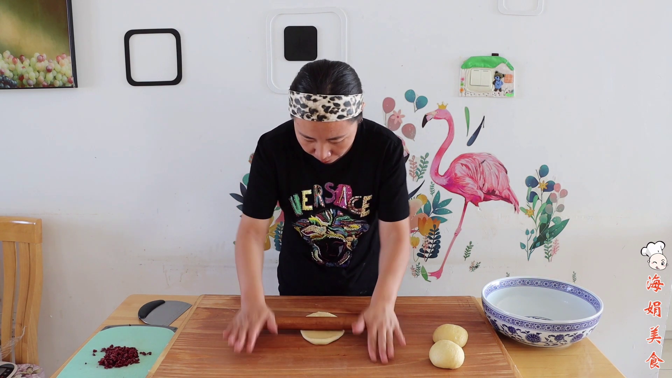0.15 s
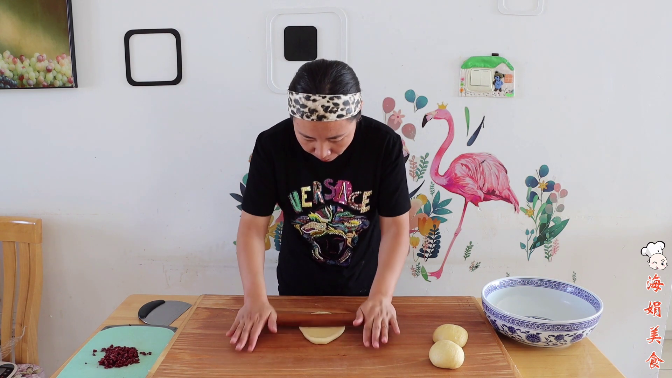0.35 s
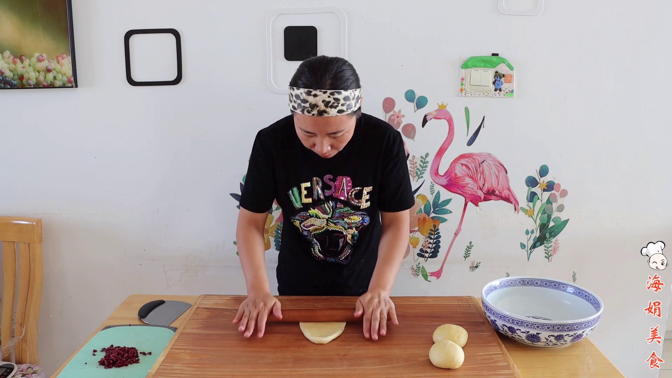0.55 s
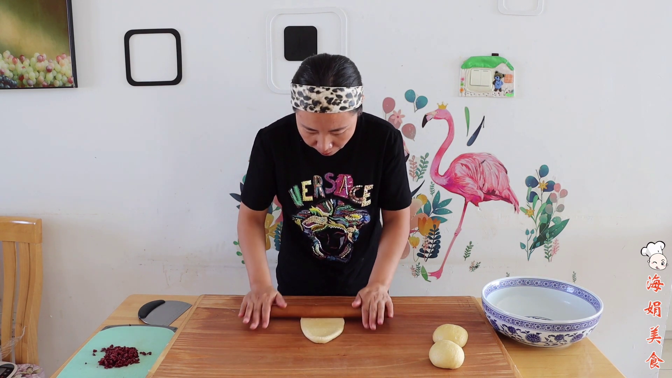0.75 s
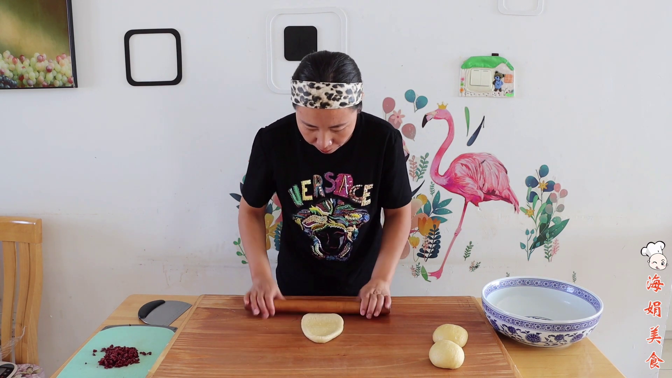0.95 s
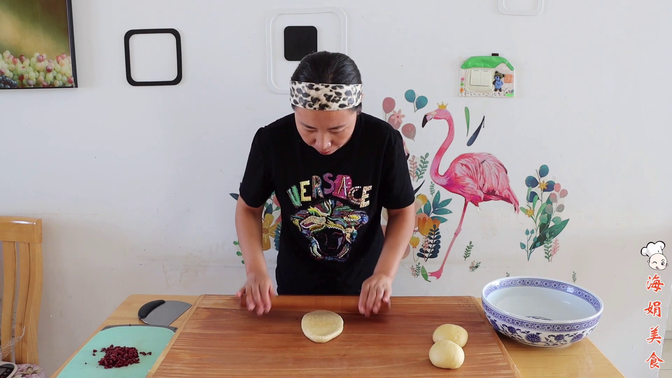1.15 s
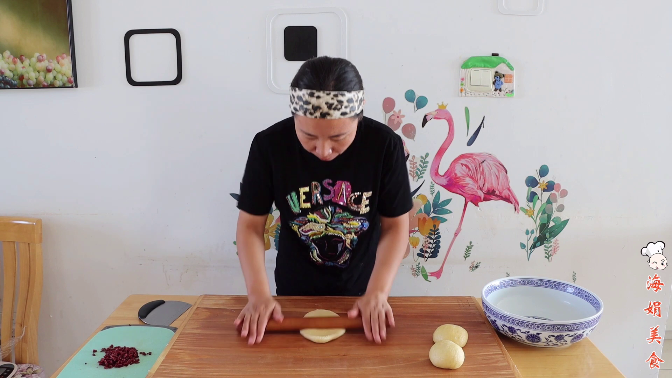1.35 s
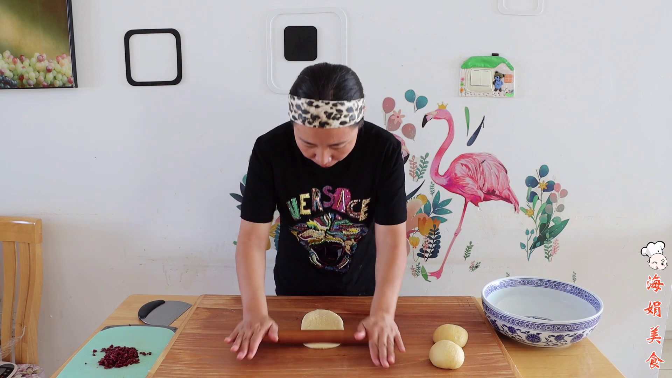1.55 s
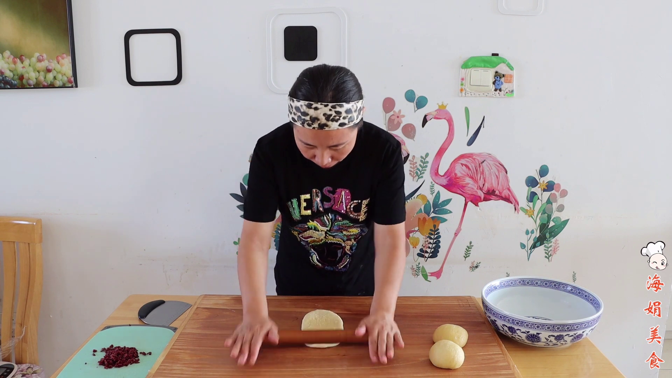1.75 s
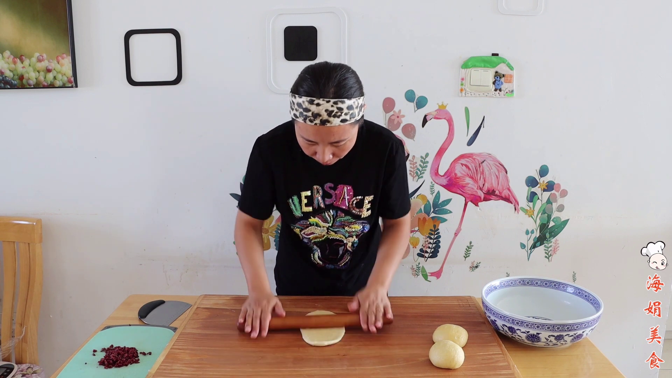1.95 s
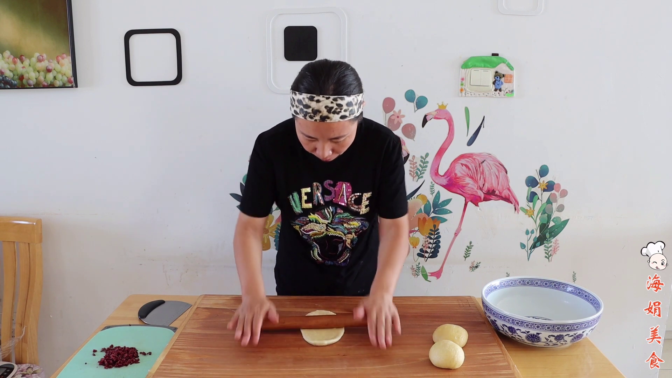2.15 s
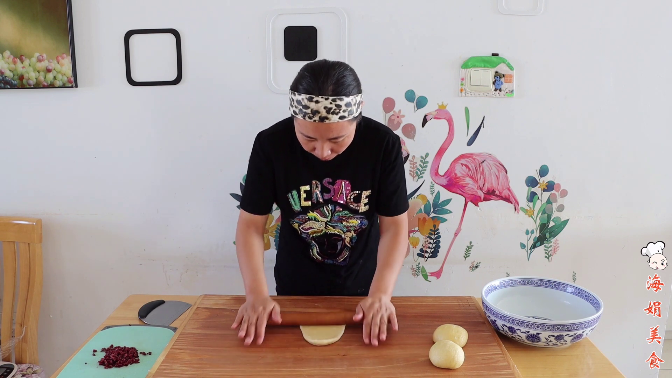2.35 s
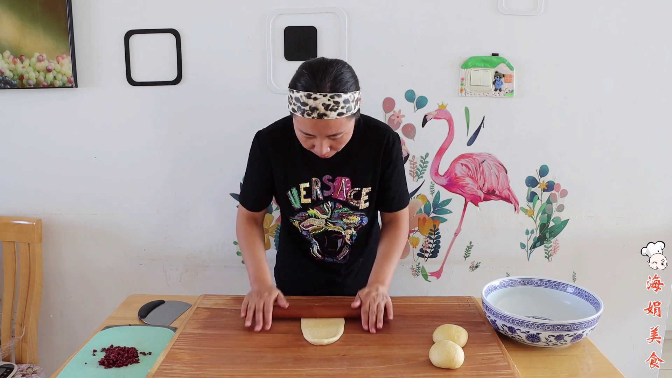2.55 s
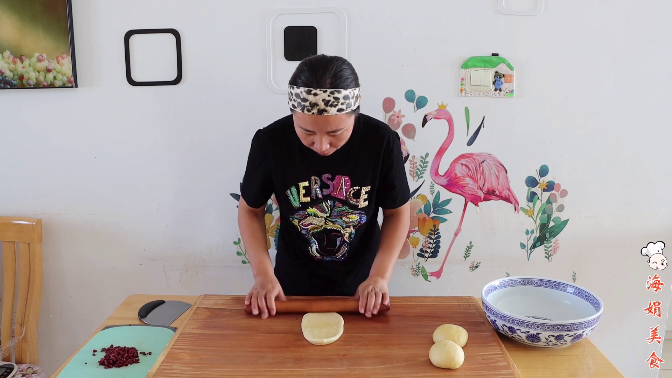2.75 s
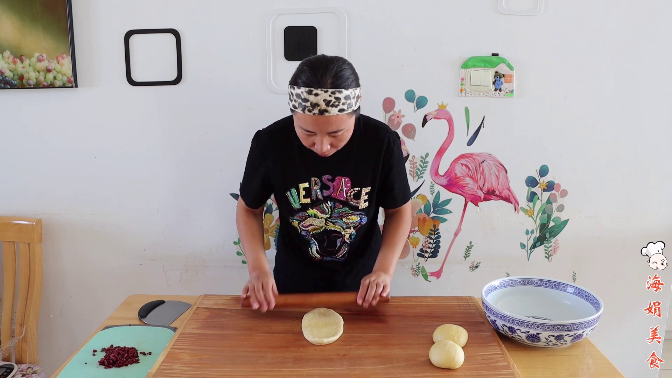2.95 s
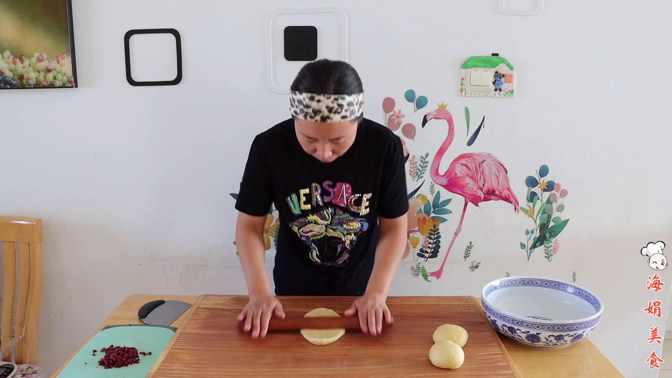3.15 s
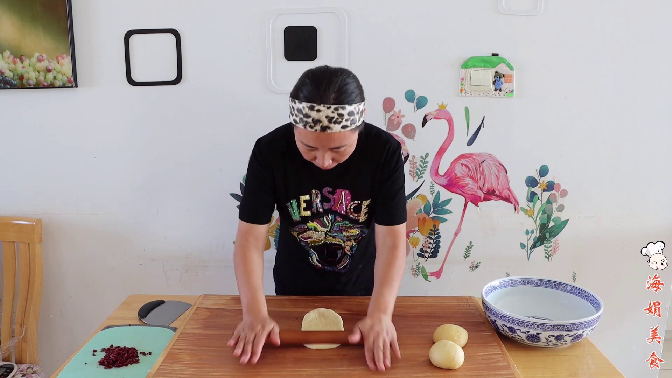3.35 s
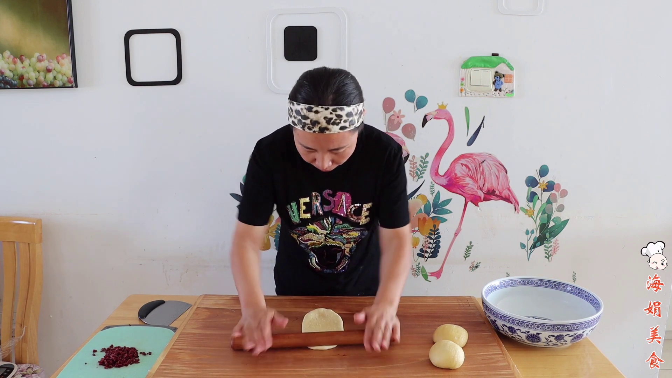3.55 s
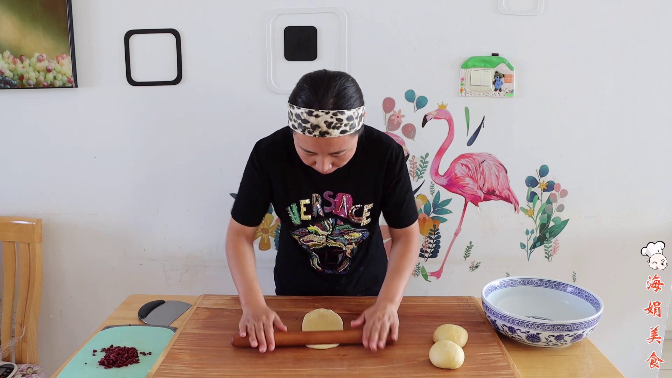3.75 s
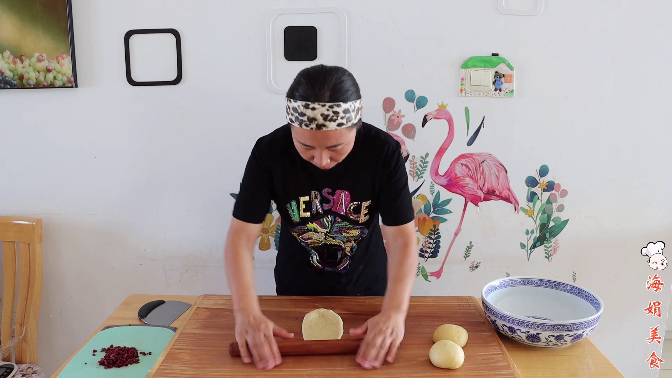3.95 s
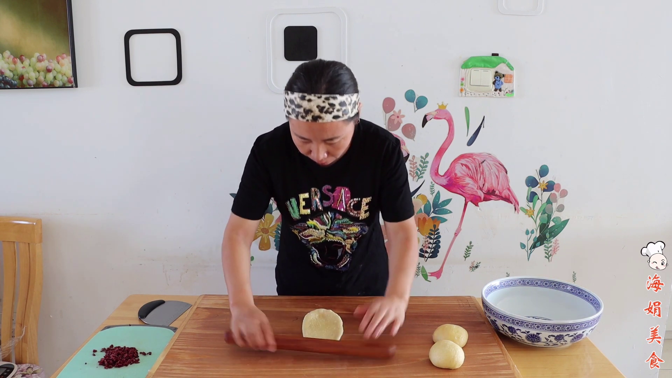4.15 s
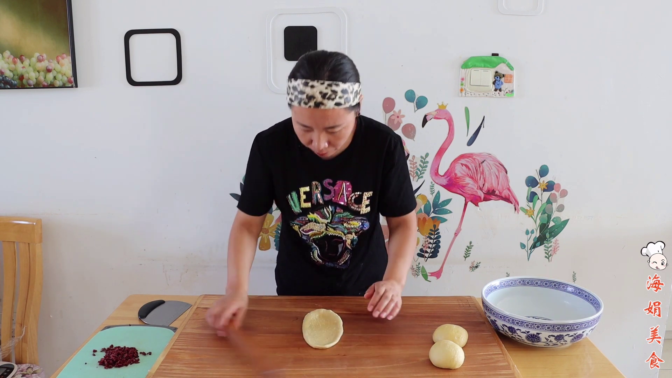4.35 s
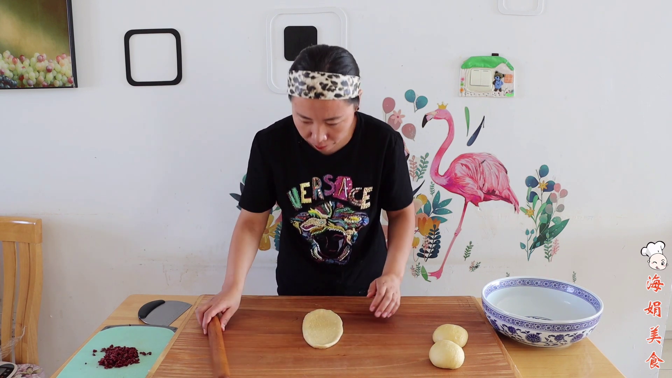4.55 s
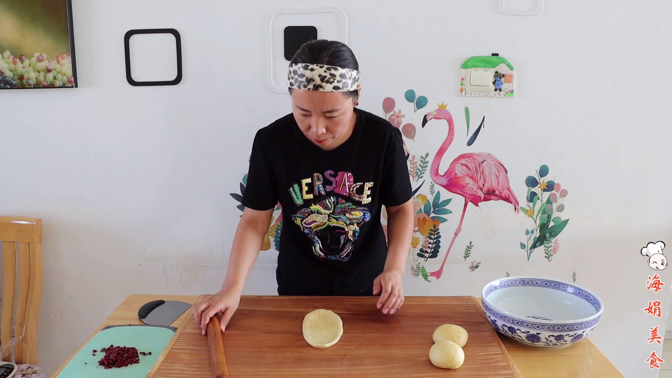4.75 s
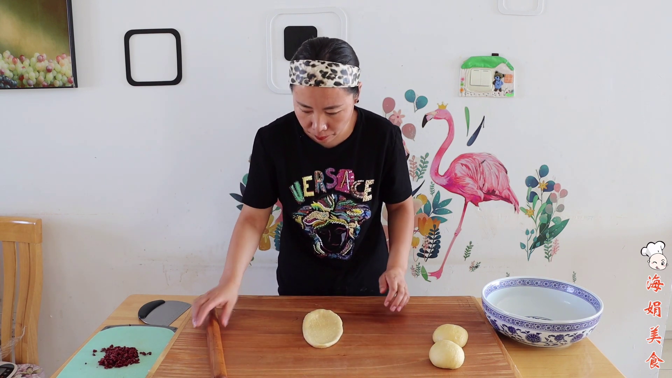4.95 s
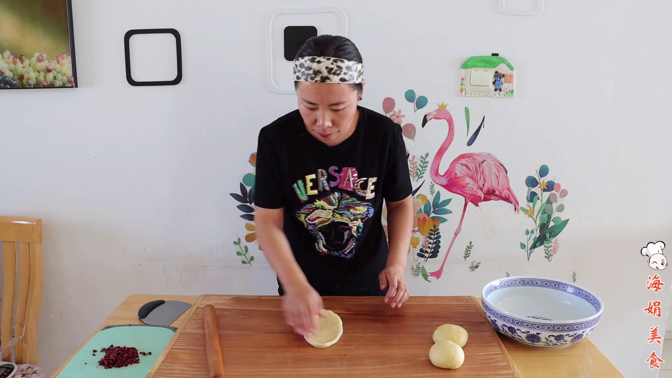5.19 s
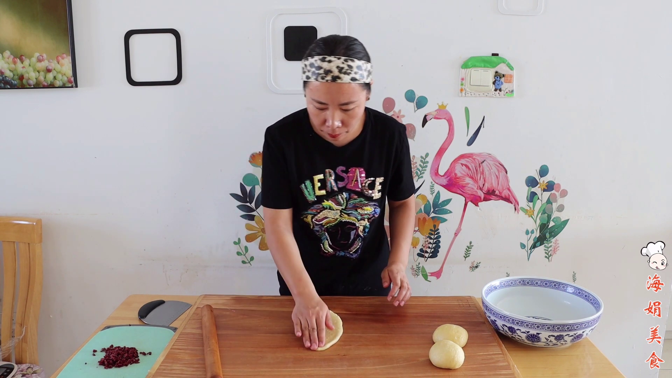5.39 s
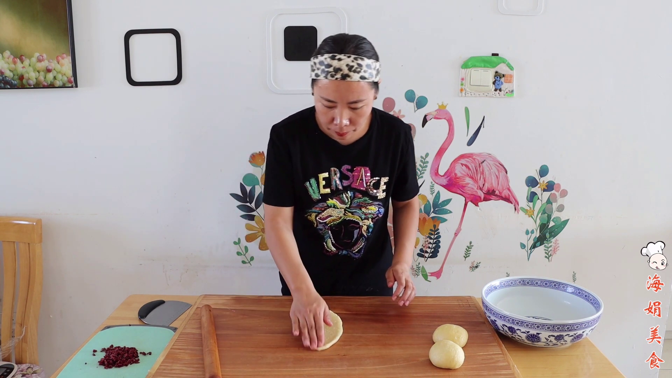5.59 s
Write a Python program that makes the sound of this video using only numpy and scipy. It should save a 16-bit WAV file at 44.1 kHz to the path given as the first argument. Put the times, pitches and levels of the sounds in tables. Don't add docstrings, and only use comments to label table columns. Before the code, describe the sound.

In a bare, hard-walled kitchen, a wooden pin rolls dough on a board about two metres from the microphone. Low hum and faint hiss continue throughout. Soft rumble, hand brushing and cushioned bumps come first, then dough slaps, tiny clinks and irregular hard wooden knocks, loudest just after three seconds. After a last strong knock near 4.6 seconds, only faint brushing and fingertip taps remain.

```python
import sys
import numpy as np
from scipy import signal
from scipy.fft import rfft, irfft, next_fast_len
from scipy.io import wavfile

SR = 44100
rng = np.random.default_rng(int(sys.argv[2]) if len(sys.argv) > 2 else 0)


def int16_out(signal):
    q = np.round(np.clip(np.atleast_2d(signal).T, -1, 1) * 32767)
    wavfile.write(sys.argv[1], SR, q.astype(np.int16))


def nominal_scale(level):
    x = np.asarray(level, float) / 20
    return 10 ** x


N = 247842
SPAN = 8192
TOUCH = np.eye(1, SPAN)[0]
TREBLE_TOP_HZ = 15800

# frequency in Hz, level in dB per Hz.
HUM_AND_HISS = [(12, -62), (20, -41), (32, -4), (54, -1), (97, -8.5), (155, 1), (178, -15), (497, -16),
                (587, -14), (674, -17), (818, -13.5), (1680, -20.5), (3270, -26.5), (15000, -32)]
# frequency in Hz, width in Hz, level in dB.
LEG_TREMBLE = [(68, 17.6, -64.5)]
# start in seconds, peak in dB, pitch in Hz.
JOLTS = [(0.298, -36, 80.7), (0.974, -38, 75), (1.316, -32.5, 68), (1.66, -55, 72.5), (2.075, -42, 76),
         (2.35, -47, 64.4), (3.156, -27.5, 77.3), (3.70, -42, 74), (3.785, -39, 72.5), (4.19, -48, 77),
         (4.613, -22, 77.4)]
# middle in seconds, length in seconds, peak in dB.
SWAYS = [(0.074, 0.076, -43), (0.191, 0.24, -42), (0.858, 0.16, -53), (1.217, 0.18, -43), (1.445, .1, -52),
         (3.265, .2, -45), (4.117, .14, -49), (4.825, 0.23, -43), (5.36, 0.11, -47), (5.484, 0.15, -43.5)]
# frequency in Hz, width in Hz, level in dB.
RUMBLE = [(140, 10, -7), (250, 28, 0.5), (500, 340, -8.5), (900, 1200, -26)]
# middle in seconds, length in seconds, peak in dB.
STROKES = [(.06, 0.85, -64), (0.535, 0.29, -45), (1.005, 0.29, -55), (1.656, 0.32, -51), (1.904, 0.12, -51),
           (2.36, .25, -53), (2.774, 0.35, -65), (3.364, 0.51, -40.5), (3.827, 0.65, -56),
           (4.11, 0.55, -67.5), (4.42, 0.34, -53), (5.348, 0.15, -52), (5.497, 0.28, -66)]
# start in seconds, length in seconds, level in dB, centre in Hz,
# width in Hz.
BRUSHES = [(.01, 0.11, -50, 865, 150), (0.296, 0.11, -50.5, 425, 200), (1.323, 0.077, -47, 397, 387),
           (1.60, 0.12, -43, 122, 39.7), (5.44, 0.12, -56, 304, 80), (0.601, 0.13, -52, 300, 398),
           (1.006, 0.18, -62, 6000, 8000), (1.928, 0.13, -61, 5000, 9000), (2.631, 0.13, -46, 250, 45),
           (2.829, 0.065, -49, 140, 50), (2.837, .16, -61, 3500, 7000), (3.51, .07, -77, 6000, 9000),
           (3.98, 0.065, -60, 7000, 12000), (4.078, 0.14, -62, 7000, 12000), (5.276, 0.17, -71, 500, 900)]
# start in seconds, peak in dB, treble lift in dB per octave,
# room share in dB, rattle in milliseconds.
BUMPS = [
    (0.015, -45.5, 15, -4, 3),
    (1.408, -33.5, -2, -6.5, 4.8),
    (1.775, -30, 2, -4, 4.4),
    (1.787, -45, 2, -10, 8.3),
    (5.299, -53.5, 13, 6.5, 8.5),
]
# frequency in Hz, level in dB per Hz.
CUSHIONED_BOARD = [(41, -35), (70, -10), (215, -5.5), (257, 1), (299, 3), (421, 5), (447, -4.5),
                   (641, -3.5), (864, -11.5), (945, -11.5), (1080, -9), (2500, -38.5), (3250, -71),
                   (5500, -120)]
# start in seconds, peak in dB, centre in Hz.
THUMPS = [(0.307, -43, 88.5), (0.484, -43, 250), (1.324, -36.5, 114), (1.616, -59, 269), (2.398, -38, 256),
          (0.609, -43, 149), (1.42, -36.5, 190), (2.681, -53, 136)]
# start in seconds, peak in dB, treble lift in dB per octave, room share in dB,
# rattle in milliseconds.
SLAPS = [
    (0.476, -34, 4, -5.5, 8.1),
    (1.597, -31.5, 5, 0.5, 8.5),
    (2.383, -24.5, 3, -3.5, 4.4),
    (3.971, -21.5, 1.5, -11, 2.1),
]
# frequency in Hz, level in dB per Hz.
SLAP_RINGS = [
    [(180, -28), (300, -19), (423, -32), (861, -4), (1140, -11), (1500, -10), (7000, -34.5), (9100, -68),
     (15400, -120)],
    [(120, -22), (200, -6), (270, -7), (366, -12), (433, 5), (1550, -3.5), (2130, -5), (11000, -31.5),
     (14300, -62), (22000, -120)],
    [(180, -29), (300, -18), (462, -5), (610, -14), (857, -6), (1200, -13.5), (1490, -12), (12000, -40.5),
     (15600, -69), (22000, -120)],
    [(180, -30), (300, -6.5), (415, -27), (531, -6), (610, -19), (1110, -17), (12000, -40.5), (15600, -64),
     (22000, -120)],
]
# start in seconds, peak in dB, treble lift in dB per octave,
# room share in dB, rattle in milliseconds.
CLINKS = [
    (0.7442, -33.5, 2, 0.5, 2.7),
    (0.9197, -33.5, 8.5, 6, 1.5),
    (0.9543, -38, 7.5, 10.5, 0.88),
]
# frequency in Hz, level in dB per Hz.
CLINK_RING = [(1410, -35), (2400, -15), (2840, -18), (3250, -5), (3580, -8), (3890, -6), (4800, -3),
              (6020, -5), (6540, -2.5), (7070, -9), (7600, -7), (8360, -11), (10000, -19), (13000, -59),
              (22000, -120)]
# frequency in Hz, width in Hz, rise in dB.
CLINK_MODES = [(3100, 120, 3), (4860, 110, 4), (6500, 110, 8), (7360, 200, 9)]
# start in seconds,
# peak in dB, centre in Hz, room share in dB.
TICKS = [(0.914, -29, 6950, -13), (0.9552, -38, 7000, -20), (1.1294, -49, 9000, -18),
         (1.3179, -40, 7000, -4), (1.6722, -31, 7900, -7), (1.6794, -45, 8000, -18),
         (2.7104, -32.5, 10000, -9), (3.1552, -12.5, 13000, -32), (3.4238, -39.5, 6000, -6),
         (3.5217, -26, 9000, -13), (3.5275, -45, 9000, -16), (3.753, -37, 10000, -4),
         (3.935, -28.5, 9000, -16), (3.9757, -18.5, 4000, -19)]
# start in seconds, peak in dB, treble lift of the direct crack
# in dB per octave, room share in dB, rattle in milliseconds.
KNOCKS = [
    (0.972, -16.5, 10.5, -2, 1.3),
    (2.0716, -8, 7.5, -5.5, 2.5),
    (3.155, 5, 9.5, -0.5, 1.4),
    (3.685, -17, 6, -3.5, 2.2),
    (4.0467, -19, 3, -7.5, 1.8),
    (4.1835, -5, 3.5, -7.5, 1.13),
    (4.6101, -2.5, 7, -4.5, 3.2),
]
# frequency in Hz, level in dB per Hz.
WOOD = [(53, -72), (97, -24.5), (212, -14), (500, -6), (820, -6), (925, -8), (1680, -10.5), (1860, -18.5)]
# multiple of the contact's top frequency, level in dB per Hz.
MUFFLE = [(1.0, -45), (1.3, -86), (2.2, -120)]
# top of the contact in Hz, bass under 300 Hz in dB, treble in dB.
LANDINGS = [(2880, 3, -14), (4500, 8, -1), (6820, 4, 1), (5000, 7, -0.5), (3460, 6.5, -1.5),
            (5470, 4.5, 0.5), (5000, 3.5, -2)]
# frequency in Hz, width in Hz.
BOARD_MODES = [(128, 52), (253, 43), (355, 124), (725, 107), (1230, 330)]
SPOTS = [(19, 7.4, 11, -1, 9), (11.8, 8, 2.4, 3, 10.5), (19, 5.2, 2.6, 5, 9.5), (15.2, 6.8, 9, 5, 4),
         (4, 6.1, 9.1, 11.5, 4), (8.7, 12.4, 4.7, 6.5, 7.5), (15, 3.9, 9.8, 2, 4.5)]
# frequency in Hz, width in Hz, rise in dB.
PIN = [
    [(1510, 48, 8), (2260, 600, 9)],
    [(2110, 110, 9.5), (1300, 91, -2), (2300, 200, 5.5), (1810, 160, -9)],
    [(2490, 450, 12), (2980, 210, -4), (3420, 230, 11.5), (3880, 540, 5), (5170, 630, 7.5)],
    [(760, 120, 7.5), (2100, 76, -6)],
    [(2200, 300, 6)],
    [(1530, 590, 6), (2430, 380, 13), (2950, 250, 0), (3350, 220, 8.5)],
    [(1164, 160, 5.5), (2280, 290, 5), (3000, 1400, 3), (5070, 300, 2)],
]
# start in seconds, peak in dB, centre in Hz.
TAPS = [(5.198, -63, 2800), (5.385, -43.5, 3970), (5.384, -44, 2600), (4.1842, -7.5, 1370),
        (1.6737, -35.5, 4560)]
# frequency in Hz, time to fall by 60 dB in seconds.
ROOM_T60 = [(60, 0.57), (125, 0.63), (250, 0.59), (500, 0.57), (1000, 0.53), (2000, 0.59), (4000, 0.66),
            (8000, 0.34), (16000, 0.15)]
# frequency in Hz, level in dB, 60 dB fall time in seconds.
ROOM_MODES = [(80, -30, .7), (125.1, 6, 0.68), (145, 11, 0.34), (193.2, 13, 0.62), (250.4, 2.5, 0.63),
              (310, -7, 0.42), (391.5, 7, 0.48), (423, -5, 0.36), (648, 0, 0.7)]
# delay in milliseconds, level in dB, sign and strength.
ECHOES = [(4.665, 7.5, 0.81), (10.535, 5.5, 0.52), (13.485, 3.5, -1.2), (17.72, -8.5, -0.58),
          (21.59, 2, 0.76)]


def level(x, db):
    return x * nominal_scale(db) / np.sqrt(np.mean(x ** 2))


def ring(x, modes):
    f = np.fft.rfftfreq(len(x), 1 / SR) + 1e-9
    response = 0
    for k, (hz, wide_hz, db) in enumerate(modes):
        once = 1 / (1 + 1j * (f / hz - hz / f) * hz / (1.76 * wide_hz))
        response = response + (-1) ** k * nominal_scale(db) * once ** 2
    return irfft(rfft(x) * response, len(x))


def swell(t, middle_s, length_s, db):
    return nominal_scale(db) * np.cos(np.pi * np.clip((t - middle_s) / length_s, -.5, .5)) ** 2


def causal(log_gain, size):
    c = irfft(log_gain, size)
    c[1:size // 2] *= 2
    c[size // 2 + 1:] = 0
    return np.exp(rfft(c))


def colour(x, points, modes, lift_db):
    hz, db = np.transpose(points)
    f = np.fft.rfftfreq(len(x), 1 / SR) + 1
    gain_db = np.interp(np.log(f), np.log(hz), db)
    gain_db = gain_db + lift_db * np.clip(np.log2(f / 1000), 0, 2.2)
    for at_hz, wide_hz, rise_db in modes:
        gain_db = gain_db + rise_db / (1 + (2 * (f - at_hz) / wide_hz) ** 2)
    return irfft(rfft(x) * causal(gain_db * np.log(10) / 20, len(x)), len(x))


def crackle(ms):
    t_ms = np.arange(SPAN) / SR * 1000
    x = rng.standard_normal(SPAN) ** 3 * np.exp(-t_ms / max(ms, .05))
    x[0] = 5.55
    flatten = causal(-np.log(np.abs(rfft(x)) + 1e-9), SPAN)
    return irfft(rfft(x) * flatten, SPAN)


def add(bus, s, near, far):
    delay_s = 0.001208
    i = int((s + delay_s) * SR)
    x = np.array([near, far])[:, :N - i]
    bus[:, i:i + x.shape[1]] += x


def strike(bus, rows, rings, modes):
    for (s, db, lift_db, wet_db, ms), points, peaks in zip(rows, rings, modes):
        peak = np.abs(colour(TOUCH, points, peaks, lift_db)).max()
        push = crackle(ms) * nominal_scale(db) * np.sqrt(1 + .5 * ms) / peak
        near = colour(push, points, peaks, lift_db)
        far = colour(push, points, peaks, 0) * nominal_scale(wet_db)
        add(bus, s, near, far)


def snap(bus, s, db, hz, wide_hz, ms, wet_db, order=1):
    crack, touch = crackle(ms), TOUCH
    for _ in range(order):
        crack = ring(crack, [(hz, wide_hz, 0)])
        touch = ring(touch, [(hz, wide_hz, 0)])
    crack = crack * nominal_scale(db) / np.abs(touch).max()
    add(bus, s, crack, crack * nominal_scale(wet_db))


def rumbling_noise(modes, db):
    return level(ring(rng.standard_normal(next_fast_len(N)), modes)[:N], db)


def hum_and_hiss():
    hz, db = np.transpose(HUM_AND_HISS)
    f = np.fft.rfftfreq(N, 1 / SR) + 1
    gain = nominal_scale(np.interp(np.log(f), np.log(hz), db)) * (f < TREBLE_TOP_HZ)
    return level(irfft(rfft(rng.standard_normal(N)) * gain, N), -52)


def table_legs():
    t = np.arange(N) / SR
    legs = rumbling_noise(LEG_TREMBLE, LEG_TREMBLE[0][2])
    for middle_s, length_s, db in SWAYS:
        sway_hz = 58.4 * (1 + 0.06 * rng.standard_normal())
        legs = legs + swell(t, middle_s, length_s, db) * np.sin(2 * np.pi * sway_hz * (t - middle_s))
    attack_s, t60_s = 0.0061, 0.41
    for s, db, hz in JOLTS:
        late = np.maximum(t - s, 0)
        shape = nominal_scale(db - 60 * late / t60_s) * (1 - np.exp(-late / attack_s))
        legs = legs + shape * np.sin(2 * np.pi * hz * late)
    return legs


def rolling():
    t = np.arange(N) / SR
    strokes = sum(swell(t, *row) for row in STROKES)
    return rumbling_noise(RUMBLE, 0) * (nominal_scale(-61) + strokes)


def brushes():
    out = np.zeros(N)
    for s, length_s, db, hz, wide_hz in BRUSHES:
        hiss = level(ring(rng.standard_normal(SPAN), [(hz, wide_hz, 0)]), db)
        n = min(int(length_s * SR), SPAN)
        i = int(s * SR)
        out[i:i + n] += hiss[:n] * np.sqrt(np.hanning(n))
    return out


def bumps(bus):
    strike(bus, BUMPS, [CUSHIONED_BOARD] * len(BUMPS), [[]] * len(BUMPS))


def thumps(bus):
    for s, db, hz in THUMPS:
        snap(bus, s, db, hz, wide_hz=71, ms=10.1, wet_db=-7)


def slaps(bus):
    strike(bus, SLAPS, SLAP_RINGS, [[]] * len(SLAPS))


def clinks(bus):
    strike(bus, CLINKS, [CLINK_RING] * len(CLINKS), [CLINK_MODES] * len(CLINKS))


def ticks(bus):
    for s, db, hz, wet_db in TICKS:
        snap(bus, s, db, hz, wide_hz=9000, ms=0.25, wet_db=wet_db)


def wood(top_hz, bass_db, treble_db):
    body = [(hz, db + bass_db * (hz < 300) + treble_db * (hz > 1400)) for hz, db in WOOD]
    return body + [(k * top_hz, db) for k, db in MUFFLE]


def knocks(bus):
    modes = []
    for spot, pin in zip(SPOTS, PIN):
        board = [(hz, wide_hz, db) for (hz, wide_hz), db in zip(BOARD_MODES, spot)]
        modes.append(board + list(pin))
    strike(bus, KNOCKS, [wood(*row) for row in LANDINGS], modes)


def taps(bus):
    for s, db, hz in TAPS:
        snap(bus, s, db, hz, wide_hz=750, ms=1.5, wet_db=-18, order=2)


def room():
    t = np.arange(SR) / SR
    at_hz, fall_s = np.transpose(ROOM_T60)
    diffuse_hz = 200
    tail = 0
    for hz in 60 * 2 ** np.arange(0, 8.1, 1 / 4):
        t60 = np.interp(np.log(hz), np.log(at_hz), fall_s)
        band = ring(rng.standard_normal(SR), [(hz, hz / 8, 0)]) * nominal_scale(-60 * t / t60)
        share_db = 10 * np.log10(hz * t60 / (1 + (diffuse_hz / hz) ** 2))
        tail = tail + level(band, share_db)
    tail = level(tail, -37) * (1 - np.exp(-t / 0.00022))
    for hz, db, t60 in ROOM_MODES:
        tail = tail + nominal_scale(db - 54.0) * np.sin(2 * np.pi * hz * t) * nominal_scale(-60 * t / t60)
    echoes = np.zeros(SR)
    for ms, db, sign in ECHOES:
        echoes[int(ms * SR / 1000)] = sign * nominal_scale(db)
    return tail + signal.lfilter([.4], [1, .4 - 1], echoes)


def scene():
    steady = hum_and_hiss() + table_legs() + rolling() + brushes()
    bus = np.zeros((2, N))
    for source in (bumps, thumps, slaps, clinks, ticks, knocks, taps):
        source(bus)
    wet = signal.fftconvolve(bus[1], room())[:N]
    return (steady + bus[0] + wet)[None]


def follow(x, release_s):
    sink = np.arange(len(x)) / (release_s * SR)
    return np.exp(np.maximum.accumulate(np.log(np.abs(x) + 1e-9) + sink) - sink)


def band_limit(x):
    return signal.sosfilt(signal.butter(12, 16960, fs=SR, output="sos"), x)


def record(dry):
    gain = np.minimum(1, nominal_scale(-7) / follow(dry[0], 0.24)) ** .5
    gain = signal.lfilter([.01], [1, .01 - 1], gain - 1) + 1
    rounded = 0.83 * np.tanh(dry * gain / 0.97)
    top = signal.ellip(5, .3, 18, TREBLE_TOP_HZ, fs=SR, output="sos")
    mix = signal.sosfilt(top, rounded)
    return band_limit(mix)


dry = scene()
out = record(dry)
int16_out(out)
```